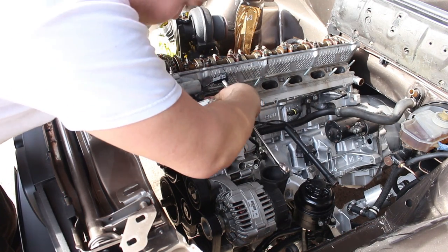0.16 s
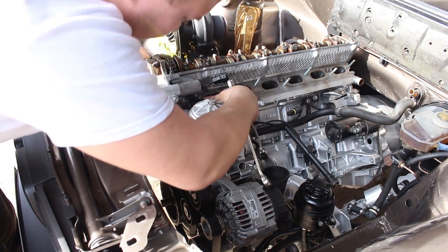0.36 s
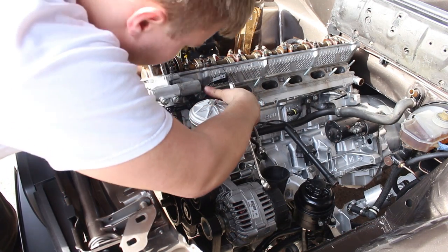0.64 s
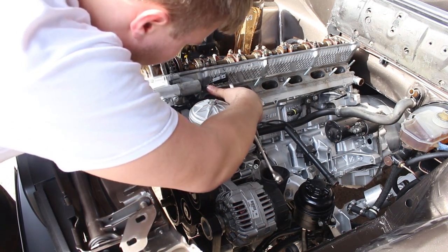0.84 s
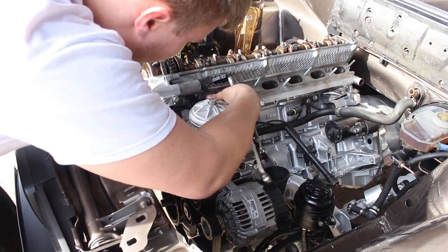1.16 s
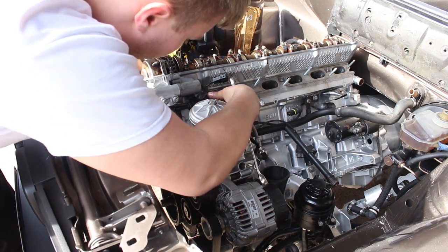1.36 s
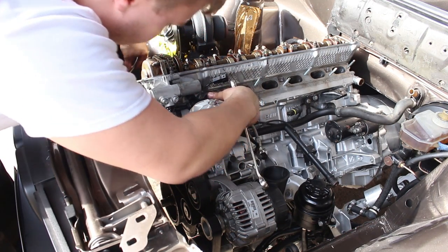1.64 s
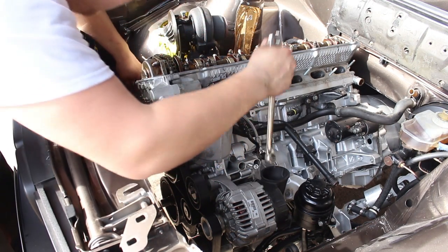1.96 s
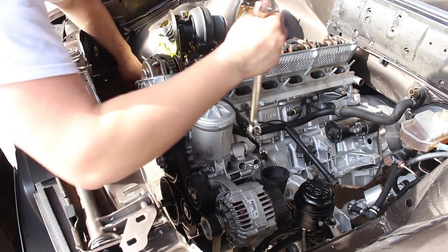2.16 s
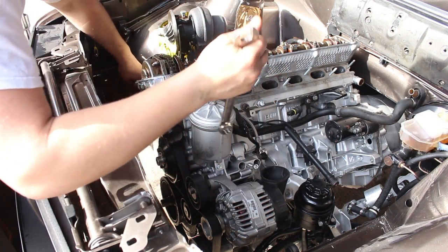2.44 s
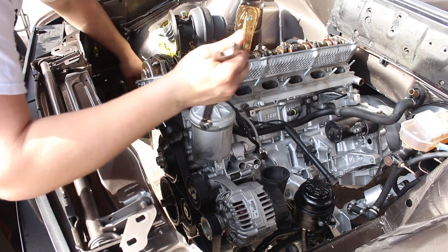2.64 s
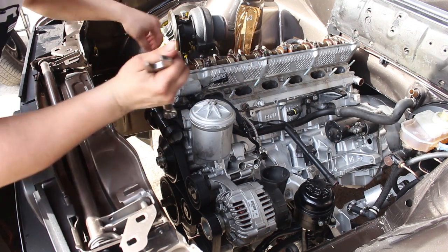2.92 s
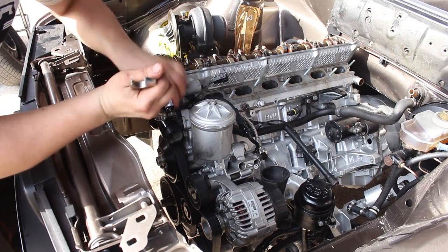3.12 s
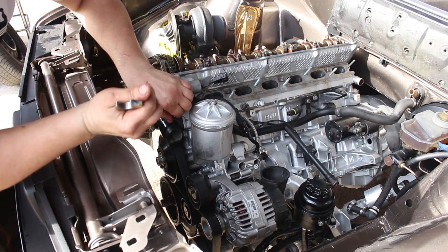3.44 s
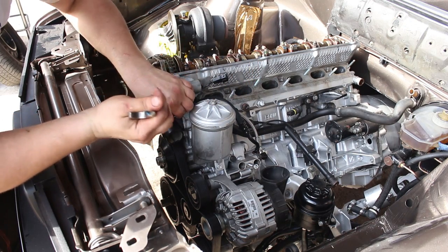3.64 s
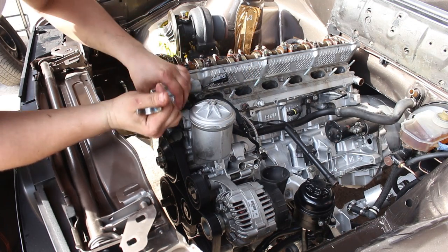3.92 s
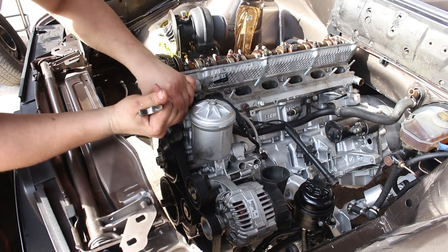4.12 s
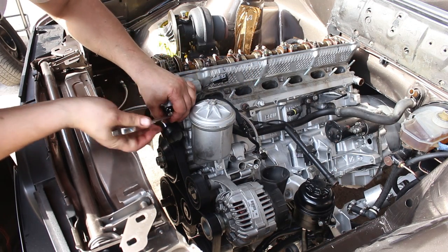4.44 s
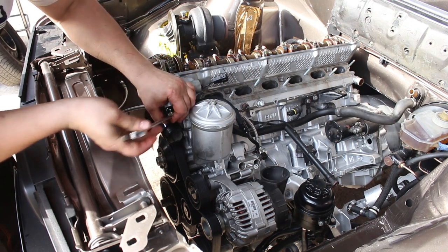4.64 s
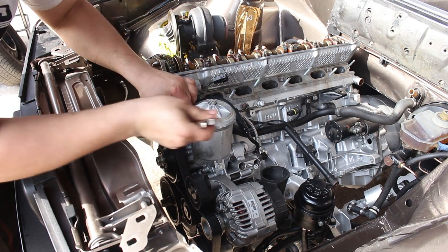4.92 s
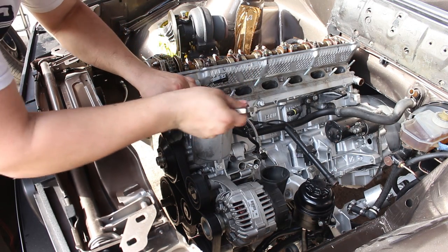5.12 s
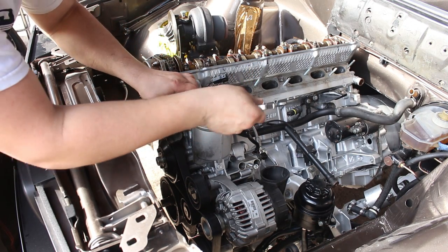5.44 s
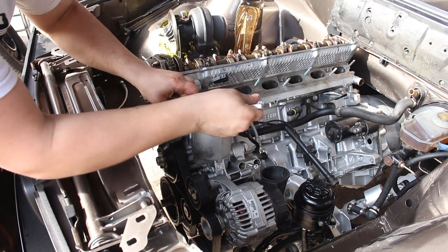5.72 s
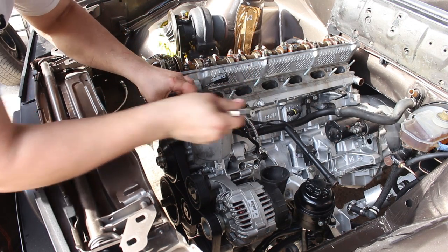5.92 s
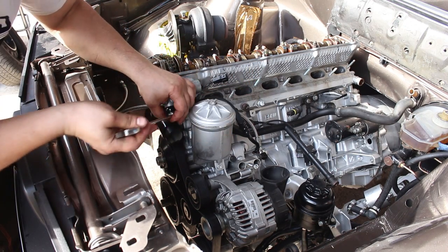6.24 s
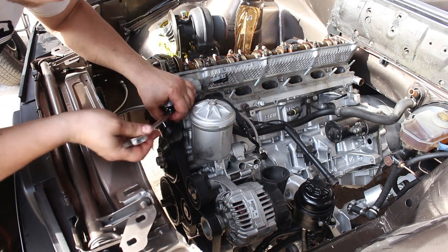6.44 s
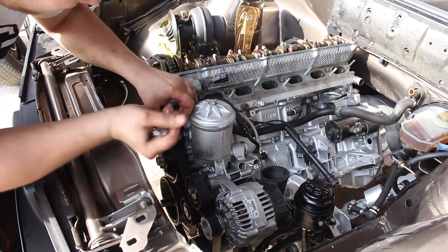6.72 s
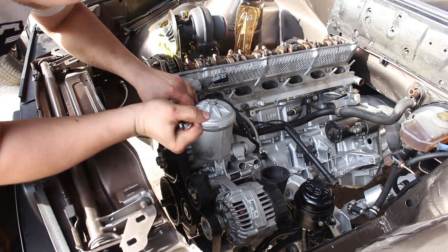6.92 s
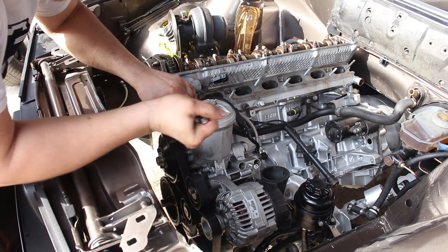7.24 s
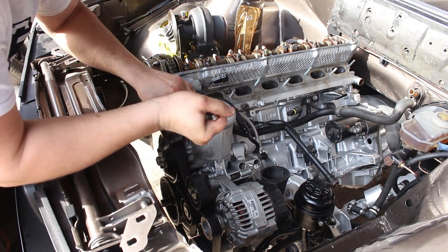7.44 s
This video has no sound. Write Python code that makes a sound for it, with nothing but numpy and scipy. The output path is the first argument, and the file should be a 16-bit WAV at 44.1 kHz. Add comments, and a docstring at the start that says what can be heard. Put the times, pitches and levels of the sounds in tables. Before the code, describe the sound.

Sparse steel knocks and a short spanner clink, one loud hollow panel bang, a pause, then ringing wrench clatter and brief scrapes on an engine.

```python
"""Steel knocks on an engine head over a faint hush; a spanner clinks in the hand, a panel is struck,
then a socket wrench rings and scrapes on a cover, and an open garage answers with a tail.
Knocks are noise bursts through resonators, rings are sums of decaying sines, scrapes are swelling grit;
the tail is convolution with decaying noise. Hush, hands rubbing on parts and wind on the microphone
are shaped noise."""
import sys
import numpy as np
from scipy import signal
from scipy.fft import rfft, irfft, next_fast_len
from scipy.io import wavfile
from scipy.ndimage import uniform_filter1d

SR = 44100
rng = np.random.default_rng(int(sys.argv[2]) if len(sys.argv) > 2 else 0)


def linear_from_db(decibels):
    """Turn decibels (scalar or array-like) into linear amplitude factors; 0 gives 1."""
    return 10 ** (np.asarray(decibels, float) / 20)


def int16_out(signal):
    """Quantize to a 16-bit WAV file."""
    q = np.round(np.clip(np.atleast_2d(signal).T, -1, 1) * 32767)
    wavfile.write(sys.argv[1], SR, q.astype(np.int16))


N = 333837


def rms_one(x):
    """Normalisation of mean power: scale to rms 1."""
    return x / np.sqrt(np.mean(x ** 2) + 1e-20)


def at_hz(points, hz):
    """Linear interpolation on a logarithmic frequency axis."""
    points = np.array(points)
    return np.interp(np.log(hz), np.log(points[:, 0]), points[:, 1])


def in_time(rows):
    """Linear interpolation of a curve in time."""
    s, value = np.transpose(rows)
    return np.interp(np.arange(N) / SR, s, value)


def band(x, low_hz, high_hz):
    """Causal Butterworth band-pass."""
    return signal.sosfilt(signal.butter(2, [low_hz, high_hz], "band", fs=SR, output="sos"), x)


def add(out, s, piece):
    """Superposition: mix a piece in at a time."""
    i = round(s * SR)
    out[i:i + len(piece)] += piece[:N - i]


def contacts(rows, thud_db, glancing_loss=0):
    """Contact stiffness: a hard contact has more edge and tick, a soft one more thud."""
    levels = []
    for s, knock_db, hard, length in rows:
        edge_db = knock_db + hard
        # glancing_loss: thud lost per dB of hardness over 0
        this_thud_db = knock_db + thud_db - 0.18 * hard - glancing_loss * max(hard, 0)
        tick_db = edge_db - 12 + 0.3 * hard
        levels.append((s, edge_db, this_thud_db, knock_db, tick_db, length))
    return levels


def knocks(blows, resonances):
    """Source and filter: a short chatter, its higher bands dying sooner, excites the part's modes."""
    t, out = np.arange(SR // 8) / SR, np.zeros(N)
    # four bands: thud, knock, edge, tick
    edges_hz, rise_s = [220, 700, 2500, 6000, 14500], [0.004, 0.0013, 0.0013, 0.00021]
    lasting = [1.3, 1.276, 0.59, 0.42]      # factor on the chatter length
    for s, edge_db, thud_db, knock_db, tick_db, length in blows:
        grains = rng.standard_normal(len(t)) * linear_from_db(3.4 * rng.standard_normal(len(t)))
        for k, db in enumerate([thud_db, knock_db, edge_db, tick_db]):
            low_hz, high_hz = edges_hz[k], edges_hz[k + 1]
            decay = np.exp(-(t / (max(length, .001) * lasting[k])) ** 1.01)
            shape = (1 - np.exp(-t / rise_s[k])) * decay
            tones = rfft(grains * np.sqrt(shape))
            # the chatter favours no pitch
            even = irfft(tones / np.abs(tones), len(t)) * np.sqrt(shape)
            burst = band(band(even, low_hz, high_hz), low_hz / 2, high_hz)
            add(out, s - .001, linear_from_db(db) * rms_one(burst) * np.sqrt(np.mean(shape ** 2)))
    body = linear_from_db(-8.0) * out
    sharpest = 12      # highest pitch-to-width ratio of a bolted part
    for k, (hz, width_hz, db) in enumerate(resonances):
        r = np.exp(-np.pi * max(width_hz, hz / sharpest) / SR)
        zeros = [(1 - r * r) / 2, 0, (r * r - 1) / 2]
        poles = [1, -2 * r * np.cos(2 * np.pi * hz / SR), r * r]
        body += (-1) ** k * linear_from_db(db) * signal.lfilter(zeros, poles, out + 1e-18)
    return body


def head_knocks():
    """Forced vibration of the engine head: contacts excite its modes."""
    # contacts: t/s, knock level/dB, hardness (edge over knock)/dB, chatter length/s before band factors
    head_blows = [(.0538, -37.5, -4.5, 0.014), (.115, -50.5, -23, 0.016), (.166, -44, -3.5, 0.025),
                  (.7196, -46, -10, 0.0058), (.789, -54.5, -4, 0.007), (1.1006, -56, -3.5, 0.025),
                  (1.191, -56.5, -5, 0.034), (1.2993, -26.5, 3.5, .0076), (1.456, -46.5, 14, 0.012),
                  (1.545, -32.5, 0, 0.013), (1.5612, -39, 0.5, .014), (1.574, -60, 4, .0093),
                  (1.596, -43.5, -2.5, 0.02), (1.7473, -42, -1.5, .0053), (1.8354, -44, 0.5, 0.012)]
    # modes of the head: f/Hz, least width/Hz, level/dB
    head_modes = [(363.4, 72, 2.5), (783, 51, 6), (1250, 580, -7), (1755, 40, 6), (2070, 250, -4),
                  (2904, 180, 4.5), (4100, 270, -3.5)]
    return knocks(contacts(head_blows, thud_db=-12), head_modes)


def panel_knocks():
    """Forced vibration of the panel: contacts excite its modes."""
    # contacts: t/s, knock level/dB, hardness (edge over knock)/dB, chatter length/s before band factors
    panel_blows = [(2.235, -33.5, -9, 0.011), (2.5095, -60.5, -14, 0.037), (2.583, -19, 2, 0.0093),
                   (2.6019, -20.5, -23, 0.0028), (2.6235, -29, -3, 0.0092), (2.8721, -55, -3, 0.043)]
    # modes of the panel: f/Hz, least width/Hz, level/dB
    panel_modes = [(419, 82, 2), (650, 40, 5.5), (818, 63, 9), (1215, 190, 6), (1718, 230, 0.5),
                   (2220, 67, 1.5), (3220, 83, -3)]
    return knocks(contacts(panel_blows, thud_db=-9), panel_modes)


def cover_knocks():
    """Forced vibration of the cover, which glancing steel-on-steel contacts hardly move."""
    # contacts: t/s, knock level/dB, hardness (edge over knock)/dB, chatter length/s before band factors
    cover_blows = [(3.8402, -57, 9, 0.018), (3.9625, -16, -8.5, 0.0096), (4.0014, -31, -12.5, 0.0077),
                   (4.0468, -30, -11.5, 0.0071), (4.1355, -25.5, 8.5, 0.007), (4.1734, -31, -2, 0.011),
                   (4.2108, -23, -11.5, 0.013), (4.2234, -20.5, -17, 0.0038), (4.3956, -30.5, -13, 0.014),
                   (4.4177, -31, -5.5, 0.011), (4.57, -36.5, -13.5, 0.013), (4.9004, -47, -7, 0.006),
                   (4.9332, -47, -12, 0.025), (4.9542, -39, -20, 0.0073), (5.0469, -27.5, -15.5, 0.008),
                   (5.1671, -34, -23, 0.01), (5.1824, -38, -22, 0.02), (5.217, -23, -16, 0.0045),
                   (5.231, -26, -9, .011), (5.4004, -61.5, 5.5, 0.014), (5.5079, -33.5, -40, 0.012),
                   (5.84, -44.5, -15, 0.012), (5.8631, -37.5, -38, 0.0062), (6.0008, -36.5, 8, 0.032),
                   (6.2772, -46, -17.5, 0.053), (6.337, -28.5, 1.5, .028), (6.3724, -15.5, -5.5, .009),
                   (6.3828, -20, -7, 0.0055), (6.5834, -40, -32, 0.0097), (6.8101, -57, -2, 0.0074)]
    # modes of the cover: f/Hz, least width/Hz, level/dB
    cover_modes = [(296.3, 17, 5.5), (447, 23, 5), (849, 27, -1), (1156, 87, 0.5), (1578, 33, 1.5),
                   (1654, 58, 4), (2032, 87, -6.5), (4034, 120, 3)]
    return knocks(contacts(cover_blows, thud_db=-18, glancing_loss=2.7), cover_modes)


def strikes(rows, top_db, top_share):
    """Modal excitation by hardness: levels of four ranges of modes, low to high, for each strike."""
    levels = []
    for s, ring_db, low_db, hard, freedom in rows:
        upper_db = ring_db + hard
        # the highest modes lie below the upper ones, less so for a hard strike
        levels.append((s, low_db, ring_db, upper_db, upper_db + top_db + top_share * hard, freedom))
    return levels


def clinks(hits, anchors_hz, hz, modes, spread_db, pressed_db, pressed_s, twin):
    """Modal synthesis: the blow sets the balance, the grip damps. Rows: middle, lean to the left."""
    t, out = np.arange(SR * 2 // 5) / SR, np.zeros((2, N))
    level_db, t60 = np.transpose(modes)
    split_hz = rng.uniform(8.7, 65, len(hz))      # close mode pairs beat
    waves = np.sin(2 * np.pi * np.outer(hz, t))
    waves = waves + twin * np.sin(2 * np.pi * np.outer(hz + split_hz, t))
    early = 1 + linear_from_db(pressed_db) * np.exp(-t / pressed_s)      # most energy leaves while steel touches
    blocks = len(t) // 500 + 1
    for s, *blow_db, freedom in hits:
        balance_db = at_hz(list(zip(anchors_hz, blow_db)), hz) + spread_db * rng.standard_normal(len(hz))
        fade = np.exp(-np.log(1000) * np.outer(1 / (t60 * max(freedom, .05)), t))
        # the moving hand makes each mode waver
        waver_db = 2.5 * rng.standard_normal((len(hz), blocks)) * np.minimum(1, np.arange(blocks) / 3)
        waver_db = uniform_filter1d(np.repeat(waver_db, 500, axis=1), size=400, axis=1)
        fade = fade * linear_from_db(waver_db)[:, :len(t)]
        # high modes beam in their own directions
        lean = 0.33 * np.sqrt(np.array(hz) / 5000) * rng.standard_normal(len(hz))
        weights = linear_from_db(level_db + balance_db) * [1 + 0 * lean, lean]
        onset = 1 - np.exp(-t / 0.0011)
        middle, side = weights @ (waves * fade) * early / early[0] * onset
        add(out[0], s - .001, middle)
        add(out[1], s - .001, side)
    return out


def spanner_rings():
    """Free vibration of the spanner, damped by the grip."""
    # strikes: t/s, ring level/dB, low-mode level/dB, hardness (upper modes over ring)/dB, factor on t60
    spanner_blows = [(1.4536, -43.5, -33, 17.5, 0.79), (1.4824, -45, -41, -20, 0.6),
                     (1.5564, -41, -32, 8.5, 0.36), (1.5764, -38.5, -48, 3, 0.22),
                     (1.6013, -47.5, -35, 3, 0.5), (1.8347, -45.5, -35.5, 0, 0.91)]
    # mode pitches: f/Hz
    spanner_pitches = [1497, 2097, 2826, 2934, 3502, 5157, 7311, 7817, 8145, 9776, 14110]
    # each mode: level/dB, t60/s before the grip factor
    spanner_modes = [(-6, 0.11), (1, 0.61), (-17, 0.11), (-2.5, 0.38), (1.5, 0.21), (-5, 0.12), (1, 0.064),
                     (-20, 0.099), (-13.5, 0.76), (-1, 0.25), (-24, 0.049)]
    return clinks(strikes(spanner_blows, top_db=-17.5, top_share=0.3), [1520, 2190, 4060, 8900],
                  spanner_pitches, spanner_modes, spread_db=1.9, pressed_db=12.0, pressed_s=0.013, twin=0.36)


def wrench_rings():
    """Free vibration of the socket wrench, damped by the grip."""
    # strikes: t/s, ring level/dB, low-mode level/dB, hardness (upper modes over ring)/dB, factor on t60
    wrench_blows = [(3.841, -72.5, -44.5, 8, .2), (3.963, -12, -36.5, -23.5, .47),
                    (3.999, -43.5, -32.5, -15, 0.52), (4.053, -41, -50.5, -12, 0.58),
                    (4.136, -22, -27, 3.5, 0.53), (4.176, -27, -34, -6, 0.49),
                    (4.224, -23.5, -28, -19, 0.64), (4.401, -23, -36.5, -22.5, 0.58),
                    (4.901, -46, -56, -26, 0.67), (5.053, -20.5, -29.5, -46, 0.32),
                    (5.166, -36.5, -47, -23, 1.2), (5.218, -24, -35, -21.5, 0.72),
                    (5.506, -22, -34, -20, 0.48), (5.858, -34, -46, -30.5, .6),
                    (6.002, -33.5, -32, 3.5, 1.34), (6.34, -32, -27, 7.5, 0.36),
                    (6.374, -20.5, -26.5, -11, 0.43), (6.589, -50.5, -40, -21, 0.46)]
    # mode pitches: f/Hz
    wrench_pitches = [702, 845, 937, 1475, 2080, 2562, 2940, 3462, 3930, 4510, 5250, 7325, 7810, 8120, 9278,
                      9790, 11700, 14110]
    # each mode: level/dB, t60/s before the grip factor
    wrench_modes = [(-8.5, 0.64), (-9.5, 0.77), (-7.5, 0.24), (-6.5, 0.29), (-17.5, 0.46), (-14, 0.32),
                    (-10.5, 0.14), (-3.5, 0.18), (-8, .08), (-5.5, 0.06), (-2.5, 0.17), (2.5, 0.14),
                    (-14.5, .1), (-14, .12), (-8, 0.12), (-4.5, 0.11), (-13.5, .12), (-19.5, .1)]
    return clinks(strikes(wrench_blows, top_db=-10.5, top_share=0.84), [800, 1500, 4500, 9000],
                  wrench_pitches, wrench_modes, spread_db=3.0, pressed_db=8.0, pressed_s=0.017, twin=0.55)


def fitting_rings():
    """Free vibration of a small fitting jarred by the tools."""
    # jolts: t/s, low-mode level/dB, high-mode level/dB, factor on t60 (at least 0.05)
    jolts = [(1.4523, -33, -53, 0.2), (1.5535, -48, -63, 1), (1.836, -74, -80, 0.6),
             (3.8417, -68.5, -67, 0), (3.965, -52.5, -63, 0.3), (3.9994, -65, -80.5, 0.8),
             (4.049, -56, -68, 0.6), (4.136, -26, -54.5, 0.4), (4.1744, -51.5, -60.5, 0.1),
             (4.2209, -54, -63, 0.24), (4.4002, -56, -84, 1), (5.5075, -66, -96, 0.75)]
    # mode pitches: f/Hz
    fitting_pitches = [5495, 10900, 12760, 13400]
    # each mode: level/dB, t60/s before the freedom factor
    fitting_modes = [(0.96, 0.21), (2, 0.19), (-1.5, .25), (0.5, .5)]
    # spread: chance in how a jolt shares out over the modes
    return clinks(jolts, [5500, 12000], fitting_pitches, fitting_modes,
                  spread_db=3, pressed_db=5.0, pressed_s=0.016, twin=0.35)


def scrapes():
    """Sliding friction: dense grit changes level as the wrench slides along metal before it seats."""
    # slides: start t/s, end t/s, final level/dB, swell/dB, upper edge f/Hz
    slides = [(5.775, 5.865, -57, 8.5, 2330), (6.302, 6.34, -34.5, 20, 5100),
              (6.345, 6.374, -47, -0.5, 5900), (4.885, 4.96, -63, 8, 2900)]
    out = np.zeros(N)
    for start, end, final_db, swell_db, top_hz in slides:
        progress = np.linspace(0, 1, round((end - start) * SR))
        grit = rng.standard_normal(SR // 8) * linear_from_db(4.7 * rng.standard_normal(SR // 8))
        grit = rms_one(band(band(grit, 380, top_hz), 440, top_hz))[:len(progress)]
        swell = linear_from_db(final_db + swell_db * (progress - 1))
        add(out, start, grit * swell * np.minimum(1, 8 * np.sin(np.pi * progress)))
    return out


def ports(middle, lean):
    """Interaural-like cues: two microphone ports side by side differ in level and phase by frequency."""
    # port differences: f/Hz, left over right level/dB, left phase lead/rad
    port_differences = [(300, -3, 0), (1000, -1, -0.2), (4053, -1.1, -0.51), (7200, 2, -0.75),
                        (14000, -7, -0.17)]
    size = next_fast_len(N)
    hz = np.arange(1, size // 2 + 2) * SR / size
    sides = np.array([[.5], [-.5]])
    phase = sides * at_hz(np.array(port_differences)[:, ::2], hz)
    response = linear_from_db(sides * at_hz(port_differences, hz)) * np.exp(1j * phase)
    return irfft(rfft(middle + 2 * sides * lean, size) * response, size)[:, :N]


def garage(x):
    """Diffuse reverberation: dense reflections as noise dying by band, partly common to both ports."""
    # reverberation time: f/Hz, t60/s
    decay_times = [(200, 0.97), (800, 1.17), (2000, 0.85), (5000, 0.53), (12000, 0.34)]
    t, tail = np.arange(SR) / SR, 0
    edges = 150 * 2 ** np.arange(0, 7.1, .5)
    for low, high in zip(edges, edges[1:]):
        decay = linear_from_db(-60 * t / at_hz(decay_times, np.sqrt(low * high)))
        tail = tail + band(rng.standard_normal((2, SR)), low, high) * decay
    first_wall_s = 0.0043
    tail = tail * (1 - np.exp(-(t / first_wall_s) ** 2))
    tail = tail + 0.44 * tail[::-1]      # the two ports hear partly the same reflections
    tail = tail * np.sqrt(2 / np.sum(tail ** 2))
    return linear_from_db(-19) * signal.fftconvolve(tail, x[None], axes=1)[:, :N]


def drift(rate_hz):
    """First-order random process: slow chance of rms 1."""
    steps = rng.standard_normal(int(N / SR * 200) + 2)      # 200 steps a second
    r = np.exp(-2 * np.pi * rate_hz / 200)
    slow = rms_one(signal.lfilter([1], [1, -r], steps))
    return np.interp(np.arange(N) * 200 / SR, np.arange(len(steps)), slow)


def coloured(spectrum, patchy_db):
    """Partly coherent noise: half-octave stereo bands, each with its own flicker; rms 1."""
    # left-right likeness: f/Hz, correlation
    likeness = [(60, 0.13), (180, 0.099), (550, 0.5), (1650, 0.25), (5000, .2), (15000, 0.39)]
    out, edges = 0, 40 * 2 ** np.arange(0, 9.1, .5)
    white = rng.standard_normal((2, 2, N))
    for k, (low, high) in enumerate(zip(edges, edges[1:])):
        mid, side = band(white[k % 2], low, high)
        hz = np.sqrt(low * high)
        alike = np.clip(at_hz(likeness, hz), 0, 1)
        gain = linear_from_db(at_hz(spectrum, hz) + patchy_db * drift(20))
        out = out + gain * (np.sqrt(1 + alike) * mid + np.sqrt(1 - alike) * side * [[1], [-1]])
    return rms_one(out)


def rubbing():
    """Friction noise of hands on parts: it flickers band by band, its level following their busyness."""
    # relative density before flicker: f/Hz, level/dB per Hz
    rub_spectrum = [(200, -7), (500, -5.5), (1000, -0.5), (2000, -9), (4000, -13), (8000, -24.5),
                    (15000, -22)]
    # busyness of the hands: t/s, level/dB before drift
    busyness = [(0, -63), (.3, -63), (.9, -70), (1.55, -65), (2.05, -71), (2.85, -66), (3.2, -73),
                (3.77, -64.5), (4.05, -73.5), (4.5, -59), (4.9, -68), (5.25, -65.5), (5.6, -73),
                (6.2, -63.5), (6.8, -68.5), (7.15, -77), (7.57, -75)]
    level_db = in_time(busyness) + 2.0 * drift(3.0)
    return linear_from_db(level_db) * coloured(rub_spectrum, patchy_db=3.0)


def hush():
    """Ambient noise: the outdoor hush keeps a steady mean level and flickers band by band."""
    # relative density before flicker: f/Hz, level/dB per Hz
    hush_spectrum = [(24, -34), (40, -4.5), (133, 5), (596, -1), (825, -3.5), (1230, -19.5), (1540, -7),
                     (2670, -16.5), (11400, -16), (15800, -20.5)]
    return linear_from_db(-68) * coloured(hush_spectrum, patchy_db=2.0)


def wind():
    """Turbulent pressure: lumpy low-frequency noise on the ports, mostly common to both."""
    # gusts: t/s, level/dB before lumps
    gusts = [(0, -92), (.62, -89), (.8, -69), (1.05, -74), (1.15, -62.5), (1.25, -71), (1.36, -60),
             (1.45, -72), (1.8, -68.5), (2.05, -81), (3.37, -87), (3.94, -82), (4.62, -90), (5.2, -88),
             (5.4, -66.5), (5.62, -73), (5.97, -88), (7.57, -88)]
    common, left, right = band(rng.standard_normal((3, N)), 27, 65)
    pressure = rms_one(common + 0.28 * np.array([left, right]))
    return linear_from_db(in_time(gusts) + 3.5 * drift(4.0)) * pressure


def scene():
    """Superposition of direct sound, reverberation and background noise."""
    panel = panel_knocks()
    rings, lean = spanner_rings() + wrench_rings() + fitting_rings()
    steel = head_knocks() + cover_knocks() + scrapes() + rings
    # the hollow under the panel feeds the garage more strongly
    near = ports(steel + panel, lean) + garage(steel + linear_from_db(4.5) * panel)
    left_over_right_db = -0.5
    air = (hush() + rubbing()) * linear_from_db(left_over_right_db * np.array([[.5], [-.5]]))
    return near + air + wind()


def band_limit(x):
    """A steep low-pass at the top of the band."""
    return signal.sosfilt(signal.butter(12, 16410, fs=SR, output="sos"), x)


def record(dry):
    """Band limitation: a steep low-pass reaches 50 dB of loss at 16.4 kHz."""
    low_pass = signal.cheby2(10, 50, 16400, fs=SR, output="sos")
    mix = signal.sosfilt(low_pass, dry)
    return band_limit(mix)


dry = scene()
out = record(dry)
int16_out(out)
```